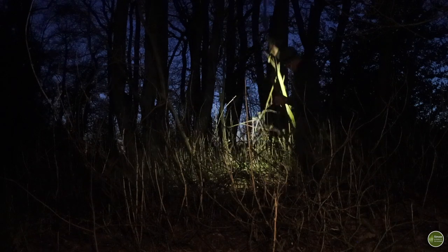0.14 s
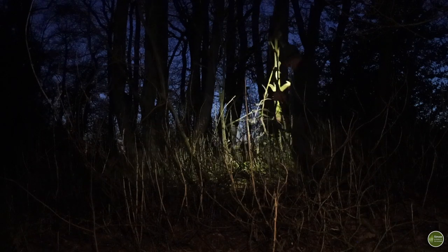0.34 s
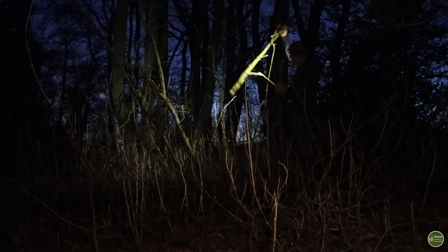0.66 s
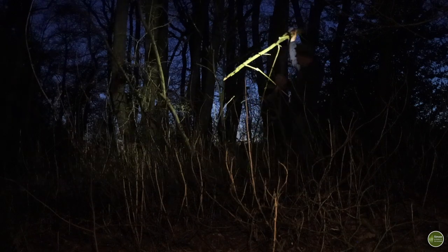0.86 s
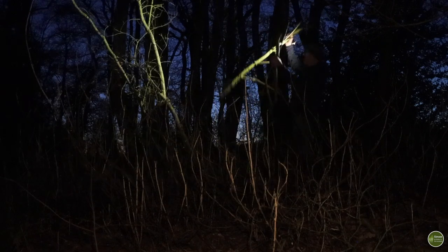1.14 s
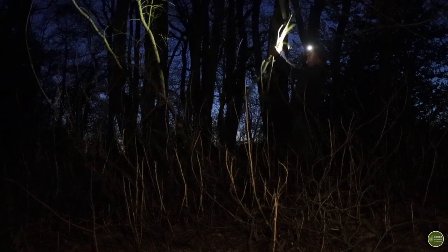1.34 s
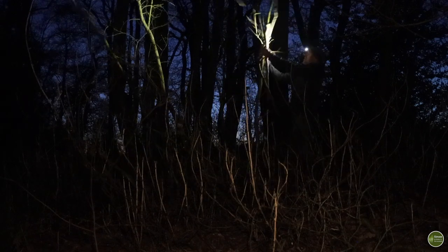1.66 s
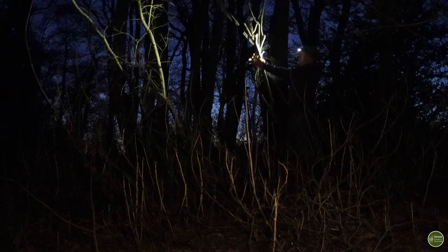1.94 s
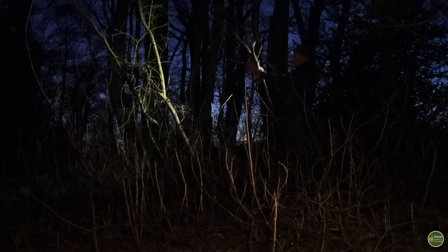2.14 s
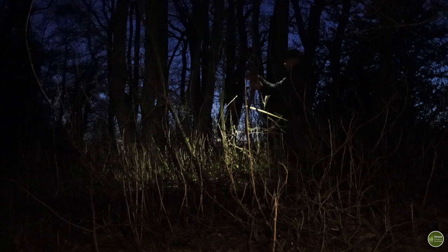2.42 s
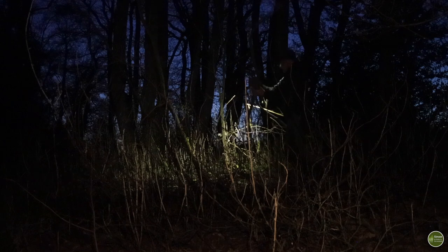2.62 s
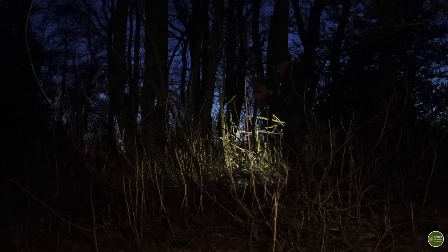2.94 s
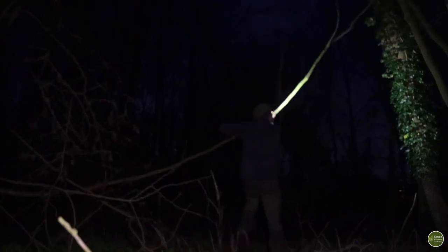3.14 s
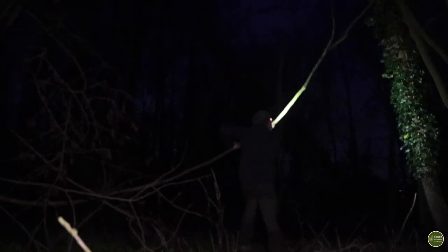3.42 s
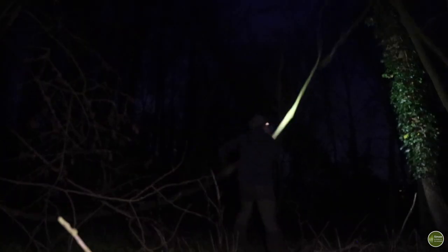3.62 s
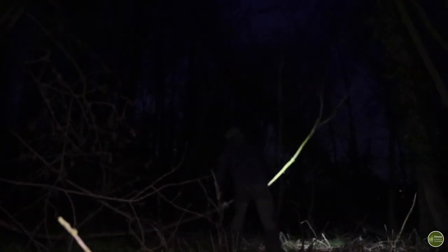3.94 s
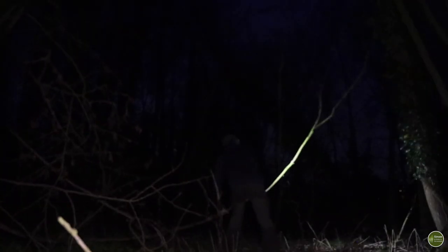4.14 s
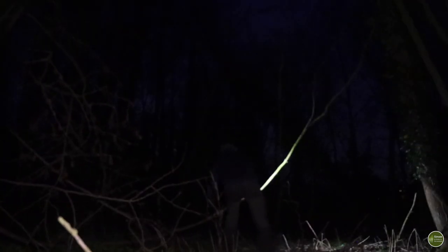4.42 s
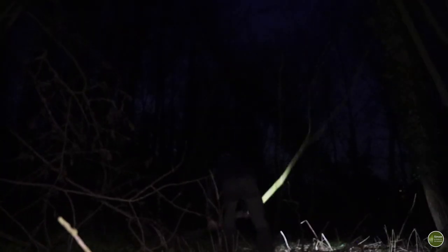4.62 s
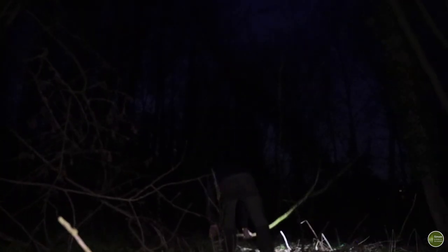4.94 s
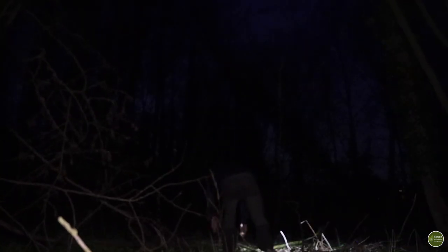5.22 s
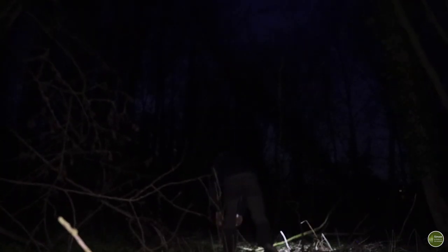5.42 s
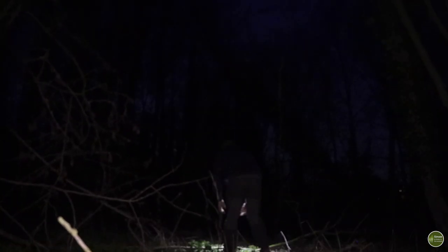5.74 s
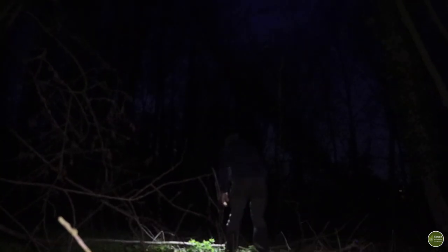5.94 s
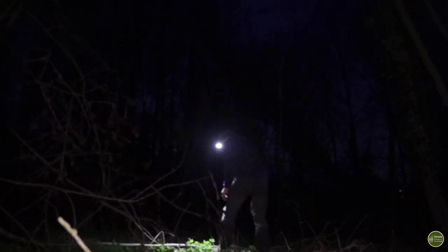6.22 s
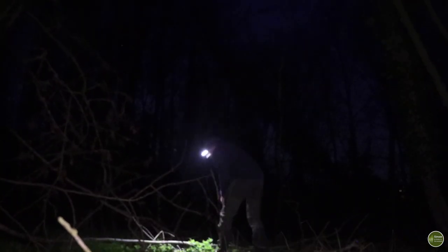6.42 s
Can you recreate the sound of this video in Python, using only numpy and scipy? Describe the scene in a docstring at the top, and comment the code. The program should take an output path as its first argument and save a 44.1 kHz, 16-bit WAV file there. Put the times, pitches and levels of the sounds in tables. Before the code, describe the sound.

A quiet woodland with a steady, faint low rumble and a barely audible fading drone. From 0 to 2.4 s dead twigs are stirred: soft dry rustle, fine ticks and small wooden clacks, the clearest near 0.4 s. At about 2.43 s one dry stick snaps, very sharp and bright, with a short scattered tail off the trunks. Light rustling continues until 3.6 s, when a branch is yanked: a tight burst of loud cracks peaks around 3.8 s over dull, heavy thuds and crunching litter. Scraping comes in uneven tugs, easing near 4.2 s, then surging from 4.6 to 5.0 s with brittle snaps and a rapid splintering tear at 4.8 s. At 5.32 s the branch lands with a hard, hollow woody knock. A few cracks follow near 5.5 s, then thinning rustles, ticks and a soft thud around 6.1 s before near quiet.

```python
"""A woodland at night: dead wood is gathered, twigs tick and rustle, and one dry stick snaps sharply.
Then a branch is dragged through undergrowth over heavy steps, splinters, and drops with a woody knock.
Breaking wood is bright noise bursts over damped modes; the rustle is coloured grains that follow level curves.
The trunks scatter wood and rustle back as a short, soft noise tail, above a steady far rumble and a faint drone."""
import sys
import numpy as np
from scipy import signal
from scipy.fft import rfft, irfft, next_fast_len
from scipy.io import wavfile
from scipy.ndimage import map_coordinates

SR = 44100
rng = np.random.default_rng(int(sys.argv[2]) if len(sys.argv) > 2 else 0)


def int16_out(signal):
    """Quantize to a 16-bit WAV file."""
    q = np.round(np.clip(np.atleast_2d(signal).T, -1, 1) * 32767)
    wavfile.write(sys.argv[1], SR, q.astype(np.int16))


N = 290026

# sticks that snap or clack: (time [s], level before the losses by thickness [dB, rms over BLOW_S],
# thickness [0 = thinnest twig to 1 = stout limb])
SNAPS = [(0.2594, -35, 0.27), (0.3781, -23.5, 0.3), (0.4734, -31.5, 0.19), (0.8885, -43, .05),
         (0.913, -37.5, 0.38), (0.9777, -41.5, 0.091), (0.986, -33.5, 0.55), (1.0481, -41.5, 0.51),
         (1.2638, -48, 0.033), (1.4305, -33.5, 0.59), (1.5307, -42, 0.63), (1.682, -39.5, 0.94),
         (1.756, -36.5, 0.21), (1.7587, -32.5, 0.56), (1.9216, -34, 0.32), (2.027, -38.5, 0.39),
         (2.103, -38.5, 0.38), (2.1288, -32, 0.23), (2.5509, -36.5, 0.46), (2.641, -39, 0.25),
         (2.9887, -37.5, 0.64), (3.2411, -34, 0.65), (3.395, -34.5, 0.51), (3.615, -20, 0.41),
         (3.6572, -18, 0.16), (3.7053, -17, 0.84), (3.723, -13, 0.45), (3.788, -18, 0.95),
         (3.8077, -9, 0.46), (3.8194, -13, 0.16), (3.9575, -18.5, 0.53), (3.978, -30, 0.071),
         (4.1214, -26, 0.36), (4.185, -29.5, 0.43), (4.2861, -30.5, 0.46), (4.499, -28.5, 0.5),
         (4.6265, -16, 0.33), (4.677, -21, 0.62), (4.7416, -19.5, .1), (4.7596, -13, 0.19),
         (4.7747, -17, 0.26), (4.9836, -22.5, 0.53), (4.9925, -15.5, 0.45), (5.0536, -15, 0.27),
         (5.079, -25, 0.27), (5.1212, -30, 0.57), (5.254, -29.5, .76), (5.331, -25, 0.13),
         (5.3948, -24.5, 0.57), (5.5083, -26.5, 0.55), (5.5326, -14.5, 0.56), (5.539, -15.5, .53),
         (5.572, -25.5, 0.52), (5.6818, -24.5, 0.51), (5.8428, -30, 0.48), (5.896, -27.5, 0.96),
         (6.0214, -32, 0.61), (6.1019, -26, 0.34), (6.4333, -38, 0.48)]
# spectrum of scraping twigs and bark: (frequency [Hz], level [dB per Hz])
TWIGS = [(200, -54.5), (600, -7.5), (1100, -2.5), (1900, -1.5), (2700, 0), (3400, 2), (4300, -13),
         (6000, -13), (12000, -32.5)]
# spectrum of dry leaves and tiny clicks: (frequency [Hz], level [dB per Hz])
LEAVES = [(1500, -46), (3500, 4.5), (5200, 2.5), (7500, -2.5), (11000, -5), (16000, -12)]
# spectrum of parting fibres, before any shift by thickness: (frequency [Hz], level [dB per Hz])
CRACK = [(100, -52), (700, -72), (2500, -21.5), (4500, -1.5), (5600, -1.5), (7000, -2.5), (11000, -8),
         (16000, -14)]
BLOW_S = .005  # time over which the level of a blow counts
DRAG_START_S = 3.6  # the branch begins to be dragged


def amp(db):
    """Decibels to gain."""
    return 10 ** (np.asarray(db) / 20)


def unit(x):
    """x at rms 1."""
    return x / np.sqrt(np.mean(x ** 2) + 1e-20)


def blow(x):
    """x with the energy of rms 1 held for BLOW_S."""
    return x * np.sqrt(BLOW_S * SR / (np.sum(x ** 2) + 1e-20))


def fade(t, t60):
    """Exponential decay by 60 dB in t60 seconds."""
    return np.exp(-np.log(1000) * t / np.maximum(t60, 1 / SR))


def along(points, hz):
    """(Hz, value) points read on a log frequency axis."""
    f, v = np.transpose(points)
    return np.interp(np.log(hz + 1), np.log(f + 1), v)


def wobble(rate):
    """A smooth random curve, rate knots a second."""
    knots = rng.standard_normal(int(N * rate / SR) + 4)
    return map_coordinates(knots, [np.arange(N) * rate / SR])


def colour(x, spectrum, size=8192):
    """Causal minimum-phase filter with the given spectrum, so that attacks stay sharp."""
    gain = amp(along(spectrum, np.fft.rfftfreq(size, 1 / SR)))
    cepstrum = irfft(np.log(gain))
    cepstrum[1:size // 2] *= 2
    cepstrum[size // 2 + 1:] = 0
    response = irfft(np.exp(rfft(cepstrum)))
    return signal.fftconvolve(x, response)[:len(x)]


def add(track, s, sound):
    """Mix a sound into a track at time s."""
    part = track[round(s * SR):][:len(sound)]
    part += sound[:len(part)]


def grains(rate, spread_db, hiss):
    """Tiny contacts of scattered size, rate a second, on the hiss of countless smaller ones."""
    size = amp(spread_db * np.minimum(rng.standard_normal(N), 2)) * rng.choice([-1, 1], N)
    contacts = unit(size * (rng.random(N) < rate / SR))
    return unit(contacts + hiss * rng.standard_normal(N))


def stick(t, centre_hz, spread, t60, count=12):
    """Free ring of one stick: its own set of damped modes, strongest around a centre pitch."""
    place = (np.arange(count) + rng.random(count)) / count * 2 - 1
    hz = centre_hz * np.exp(spread * place)
    size = rng.standard_normal(count) * np.cos(place * np.pi / 2)
    rise = 1 - np.exp(-2 * t * centre_hz)  # time constant: half a cycle of the centre pitch
    modes = size @ np.sin(2 * np.pi * hz[:, None] * t)
    return blow(modes * rise * fade(t, t60))


def air():
    """Steady far rumble of the night as coloured noise, and a faint far drone that sinks 6 dB a second."""
    # rumble spectrum: (frequency [Hz], level [dB per Hz])
    rumble_spectrum = [(15, -41), (30, -37), (50, 2), (90, 2.5), (150, 5), (260, -22), (420, -14),
                       (800, -3.5), (1500, -14.5), (3000, -25.5), (6000, -21), (16000, -26.5)]
    # drone spectrum: (frequency [Hz], level [dB per Hz])
    drone_spectrum = [(250, -42), (345, -9), (372, -3), (400, -10), (520, -47)]
    rumble = amp(-54.0) * unit(colour(rng.standard_normal(N), rumble_spectrum))
    drone_gain = amp(-57.5 - 6 * np.arange(N) / SR)
    return rumble + drone_gain * unit(colour(rng.standard_normal(N), drone_spectrum))


def woodland(x, size=128):
    """Trunks scatter sound into a diffuse tail at once; two groups of them swell it soon after as blurred echoes."""
    # what the trunks return: (frequency [Hz], scattered share [dB])
    trunk_share = [(100, -8), (700, -18), (3000, -10.5), (6000, -14), (16000, -11.5)]
    # how long the wood rings on: (frequency [Hz], t60 [s])
    tail_t60 = [(150, 1), (1000, 0.22), (3500, 0.4), (8000, 0.2), (16000, 0.13)]
    hz, t, z = signal.stft(x, SR, nperseg=size)
    lag = t[t < .5]
    near_group = 3 * np.exp(-((lag - .03) / .005) ** 2)
    farther_group = 2.2 * np.exp(-((lag - .064) / .012) ** 2)
    onset = 1 - np.exp(-lag / 0.00092)
    decay = fade(lag, along(tail_t60, hz)[:, None]) ** 2  # squared: energy
    tail = decay * (1 + near_group + farther_group) * onset
    # each band's energy lingers, while its fine structure is scrambled
    tail = tail / tail.sum(1, keepdims=True)
    power = np.abs(signal.fftconvolve(np.abs(z) ** 2, tail, axes=1))[:, :len(t)]
    noise = signal.stft(grains(rate=2100, spread_db=8.5, hiss=0.41), SR, nperseg=size)[2]
    wet = noise / np.std(noise) * np.sqrt(power) * amp(along(trunk_share, hz))[:, None]
    return signal.istft(wet, SR, nperseg=size)[1][:N]


def rustle_levels():
    """dB curves of litter, twigs and leaves: slow stirring, then a fading drag, with tugs that hold and settle."""
    # stirring while wood is gathered, before its gain:
    # (time [s], ground litter level [dB], twigs level [dB], leaves level [dB])
    stirring = [(0.0, -54, -50.5, -56), (0.23, -50, -45, -53), (0.45, -51.5, -46, -51.5),
                (0.89, -54, -51, -58), (1.07, -57, -56.5, -61), (1.24, -57, -55.5, -72),
                (1.48, -58, -58.5, -63), (1.64, -50, -54, -62), (1.98, -52, -53.5, -60),
                (2.32, -49, -45, -54), (2.51, -52, -44.5, -48), (2.7, -50, -47.5, -57),
                (3.17, -47, -47, -61.5), (3.55, -48.5, -48.5, -61)]
    # gain on the stirring: litter, twigs, leaves [dB]
    stir_gain_db = [1.5, 1.13, 1.7]
    # tugs that pull wood through the brush: (start [s], hold [s], twigs level [dB],
    # leaves level [dB over twigs], litter level [dB over twigs])
    tugs = [(0.577, 0.087, -45, -4.5, -18), (2.224, .04, -53, -15, -8), (2.889, .09, -42, -5.5, -16),
            (3.606, .025, -37, -10, 9.5), (3.653, 0.034, -27.5, -13, 2), (3.698, .11, -24, -6, -1.5),
            (3.863, 0.059, -28.5, -13, -1), (3.939, 0.022, -30, -5, 0), (4.003, 0.017, -33.5, -21, -7),
            (4.044, .095, -33, -9, -8), (4.277, 0.034, -35, -11, -9.5), (4.355, 0.012, -35, -29, -8),
            (4.456, 0.062, -36.5, -18, -2.5), (4.554, 0.15, -33, -10, -0.5),
            (4.67, 0.12, -25.5, -11.5, -10.5), (4.808, 0.053, -19.5, -4, -9), (4.884, 0.1, -24, -8.5, -4.5),
            (5.048, 0.074, -31.5, -12, -10), (5.143, 0.062, -38.5, -3.5, -8), (5.272, .05, -27, -23, -5.5),
            (5.336, 0.095, -39.5, -4.5, 4), (5.438, 0.08, -37.5, -16, -16), (5.535, 0.071, -29, -18, -7.5),
            (5.635, 0.07, -32.5, -17.5, -11), (5.786, 0.13, -40.5, -4, -2), (6.016, 0.14, -42, -6.5, 3.5),
            (6.339, 0.046, -44.5, -6, -3)]
    attack_s, release_s = .01, 0.25  # take hold; let the brush settle by 60 dB
    drag_start_db, drag_fade_db_per_s = [-42.5, -41, -51], 3  # scraping between tugs: litter, twigs, leaves
    t = np.arange(N) / SR
    times, *stir_db = np.transpose(stirring)
    drag = amp(-drag_fade_db_per_s * (t - DRAG_START_S)) * (t > DRAG_START_S)
    powers = []
    for db, gain_db, drag_db in zip(stir_db, stir_gain_db, drag_start_db):
        stir = amp(np.interp(t, times, db) + gain_db)
        powers.append(stir ** 2 + (amp(drag_db) * drag) ** 2)
    age = t[:SR // 2]
    for s, hold, twig_db, leaf_db, litter_db in tugs:
        shape = np.minimum(age / attack_s, 1) * fade(np.maximum(age - hold, 0), release_s)
        for power, over_db in zip(powers, (litter_db, 0, leaf_db)):
            add(power, s, (amp(twig_db + over_db) * shape) ** 2)
    return 10 * np.log10(powers)


def brush(litter_db, twig_db, leaf_db):
    """Steps crush the litter while twigs and dry leaves scrape past each other: coloured grains with hiss."""
    # spectrum of crushed ground litter: (frequency [Hz], level [dB per Hz])
    tread_spectrum = [(20, -33), (55, -15.5), (110, -7), (160, -2), (270, -2.5), (420, -2), (750, -6.5),
                      (1200, -9.5), (3000, -68.5)]
    catch_db = 2.2 * wobble(70)  # twigs catch and let go, shaking their leaves too
    tread = unit(colour(grains(rate=500, spread_db=1.0, hiss=0.6), tread_spectrum))
    twigs = unit(colour(grains(rate=900, spread_db=3.0, hiss=1.0), TWIGS))
    leaves = unit(colour(grains(rate=820, spread_db=-1.5, hiss=0.8), LEAVES))
    tread *= amp(litter_db - 4.5 + 0.88 * wobble(45))
    twigs *= amp(twig_db - 3 + catch_db)
    leaves *= amp(leaf_db - 1.5 + catch_db)
    return tread + twigs + leaves


def crackle(twig_db, leaf_db, count=600):
    """Small twigs tick at random, a short ring and a click each, louder where the brush is pushed harder."""
    track, t = np.zeros(N), np.arange(SR // 45) / SR
    chance = np.clip(rng.standard_normal((count, 3)), -2, 1.6)
    for s, (size, thin, bright) in zip(rng.random(count) * N / SR, chance):
        ring = stick(t, centre_hz=2750 * np.exp(.13 * thin), spread=.52, t60=.026, count=11)
        click = rng.standard_normal(len(t)) * (fade(t, .003) + fade(t, .016) / 5)
        click = blow(colour(click, LEAVES, size=512))
        now = int(s * SR)
        ring_db = twig_db[now] - 4 + 3.5 * size
        click_db = leaf_db[now] - 4.5 + 3 * size + 2 * thin + 2.5 * bright
        add(track, s, amp(ring_db) * ring + amp(click_db) * click)
    return track


def thumps():
    """Boots and the dragged branch load soft soil and buried wood: dull, slow-rising thuds of damped modes."""
    # (time [s], level [dB], centre pitch [Hz])
    thuds = [(3.13, -36, 948), (3.35, -40, 797), (3.712, -19.5, 702), (3.826, -19, 329.3),
             (3.876, -25, 275.7), (3.965, -30.5, 309), (4.074, -26, 233.8), (4.29, -28, 207),
             (4.56, -26.5, 350.6), (4.691, -21.5, 329.4), (5.286, -30, 166), (6.02, -33.5, 163),
             (6.092, -25.5, 248.4)]
    track, t = np.zeros(N), np.arange(SR // 3) / SR
    for s, db, hz in thuds:
        thud = stick(t, centre_hz=hz, spread=0.79, t60=0.25) * (1 - np.exp(-t / 0.0056))
        add(track, s, amp(db) * blow(thud))
    return track


def strain():
    """Just before a hard snap the first fibres give way in a quickly rising crunch."""
    crunch_db, growth = -3.5, 0.47  # crunch before a 0 dB snap; extra dB lost per dB softer snap
    rise_s = 0.036  # time to rise by 60 dB
    track, t = np.zeros(N), np.arange(SR // 40) / SR
    for s, db, thickness in SNAPS:
        fibres = rng.standard_normal(len(t)) ** 3 * fade(t, rise_s)[::-1]
        crunch = blow(colour(fibres, TWIGS, size=512))
        add(track, s - t[-1], amp(db + crunch_db + growth * db) * crunch)
    return track


def tear(count=8):
    """Snap rows of a limb tearing along its grain: one quick uneven run that grows louder."""
    start_s, gap_s, start_db, swell_db, mean_thickness = 4.8134, .0092, -16, 3, 0.39
    late, thicker = rng.uniform(-1, 1, (count, 2)).T
    times = start_s + gap_s * (np.arange(count) + .25 * late)
    db = start_db + swell_db * np.linspace(0, 1, count)
    return list(zip(times, db, mean_thickness + 0.15 * thicker))


def twiglets(twig_db, count=36):
    """Snap rows of thin twigs that the dragged branch breaks at random, louder where the brush is pushed."""
    weakest_db, range_db, thickest = -9.5, 8, 0.6  # levels over the twig rustle
    when, size, thin = rng.random((count, 3)).T
    times = DRAG_START_S + when * (N / SR - DRAG_START_S)
    db = twig_db[(times * SR).astype(int)] + weakest_db + range_db * size ** 2
    return list(zip(times, db, thickest * thin))


def snaps(twig_db):
    """Fibres part in a bright crack, the freed stick rings, wood behind knocks; stout wood cracks less."""
    thin_loss_db, thick_loss_db = 19, 38.5  # knock lost by the thinnest, crack lost by the thickest
    ring_loss_db = 10  # ring lost by either
    pitch_octaves, usual_thickness = 0.97, 0.412  # rise from stoutest to thinnest; unshifted at this thickness
    thin_t60_s, thick_t60_s = 0.033, 0.043  # base times, scaled for each part below
    wood, cracks, t = np.zeros(N), np.zeros(N), np.arange(SR // 20) / SR
    for s, db, thickness in [*tear(), *twiglets(twig_db), *SNAPS]:
        knock_db = db - thin_loss_db * (1 - thickness) ** 2
        ring_db = db - ring_loss_db * (2 * thickness - 1) ** 2
        crack_db = db - thick_loss_db * thickness ** 2
        t60 = thin_t60_s + (thick_t60_s - thin_t60_s) * thickness
        shift = 2 ** (pitch_octaves * (usual_thickness - thickness))
        knock = stick(t, centre_hz=1750 * shift, spread=0.56, t60=t60 * 1.6)
        knock += amp(-13) * stick(t, centre_hz=563.0, spread=0.655, t60=t60 * 2.2)
        ring = stick(t, centre_hz=2897, spread=.56, t60=t60 * 1.15, count=28)
        add(wood, s, amp(knock_db) * knock + amp(ring_db) * ring)
        # the main break lasts about a millisecond; splinters follow while the stick still shakes
        fibres = rng.standard_normal(len(t)) * (fade(t, t60 * .2) + fade(t, t60 * 1.2) / 4)
        shifted_crack = np.array(CRACK) * [shift, 1]
        add(cracks, s, amp(crack_db) * blow(colour(fibres, shifted_crack, size=512)))
    return wood + cracks


def strike(blows, modes, bark_db, splinter_db, splinter_t60):
    """Blows ring one piece of wood with a crunch of bark and splinters; soft contacts weaken its high modes."""
    mode_scatter_db = 3  # how far each mode's level varies from blow to blow
    track, t = np.zeros(N), np.arange(SR // 4) / SR
    hz, db, t60 = np.transpose(modes)
    for s, blow_db, soft in blows:
        size = amp(db + rng.normal(0, mode_scatter_db, len(hz)))
        size /= np.hypot(1, 2 * np.pi * hz * soft)
        phase = 2 * np.pi * (hz[:, None] * t + rng.random((len(hz), 1)))
        rise = 1 - np.exp(-2 * hz[:, None] * t)
        ring = blow(size @ (np.sin(phase) * rise * fade(t, t60[:, None])))
        bark = blow(colour(rng.standard_normal(len(t)) * fade(t, 0.016), TWIGS))
        splinters = blow(colour(rng.standard_normal(len(t)) * fade(t, splinter_t60), CRACK))
        add(track, s, amp(blow_db) * (ring + amp(bark_db) * bark + amp(splinter_db) * splinters))
    return track


def fracture():
    """A dry stick gives way in stages, each a blow to its short, bright modes."""
    # (time [s], level of the ring [dB], contact softness [s])
    stages = [(2.4311, -24, .00001), (2.4321, -16.5, 0.000023), (2.4328, -9, .00001),
              (2.4358, -19, 0.000059), (2.4473, -37, .00002)]
    # modes of the stick: (frequency [Hz], level [dB], t60 [s])
    dry_stick = [(327, -36, 0.023), (585, -27.5, 0.036), (1300, -10.5, 0.024), (1740, -12, 0.031),
                 (2470, -4.5, 0.026), (2740, -13.5, 0.028), (3250, -5, 0.032), (4680, 1, 0.008),
                 (5150, 8.5, 0.0063), (5570, 4, 0.0067), (6700, -18, 0.014), (8300, -15, 0.011)]
    return strike(stages, dry_stick, bark_db=-13, splinter_db=-4.0, splinter_t60=0.012)


def landing():
    """The heavy branch lands in several close contacts that ring its bending modes."""
    # (time [s], level of the ring [dB], contact softness [s])
    contacts = [(5.3195, -14.5, .00003), (5.3233, -9, 0.000021), (5.3281, -8.5, 0.00024),
                (5.337, -22, 0.001)]
    # bending modes of the branch: (frequency [Hz], level [dB], t60 [s])
    branch = [(258.7, -25.5, 0.13), (410, -15, 0.052), (574, -6.5, 0.023), (860, -8, 0.06),
              (1290, 0, 0.028), (1560, -10, 0.021), (1790, -4.5, 0.052), (2000, 4.5, 0.019),
              (2270, -10, 0.02), (2500, 4, 0.0078), (2800, -15, 0.051), (3523, -0.5, 0.04),
              (4030, 6, 0.0055)]
    return strike(contacts, branch, bark_db=-14.5, splinter_db=-22, splinter_t60=0.12)


def scene():
    """Breaking wood and rustling brush among the trees."""
    litter_db, twig_db, leaf_db = rustle_levels()
    rustle = brush(litter_db, twig_db, leaf_db) + crackle(twig_db, leaf_db)
    hits = strain() + snaps(twig_db) + fracture() + landing()
    scattered = woodland(hits + amp(-2.5) * rustle)
    return (air() + scattered + rustle + thumps() + hits)[None]


def record(dry):
    """The microphone input clips whatever exceeds full scale; a steep low-pass then limits the band."""
    top_hz = 15950
    clipped = np.clip(dry, -1, 1)
    size = next_fast_len(N + SR // 2)
    low_pass = 1 / (1 + (np.fft.rfftfreq(size, 1 / SR) / top_hz) ** 150)
    return irfft(rfft(clipped, size) * low_pass, size)[..., :N]


dry = scene()
out = record(dry)
int16_out(out)
```